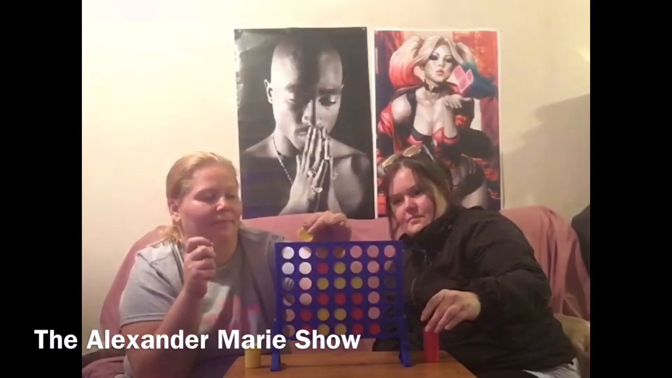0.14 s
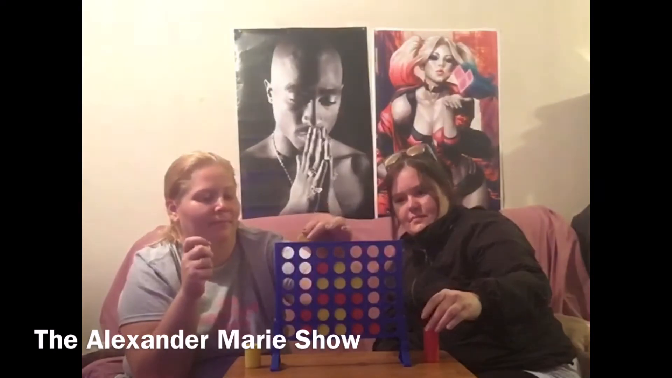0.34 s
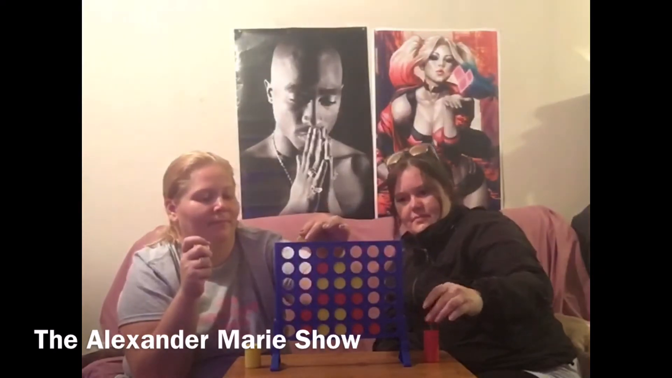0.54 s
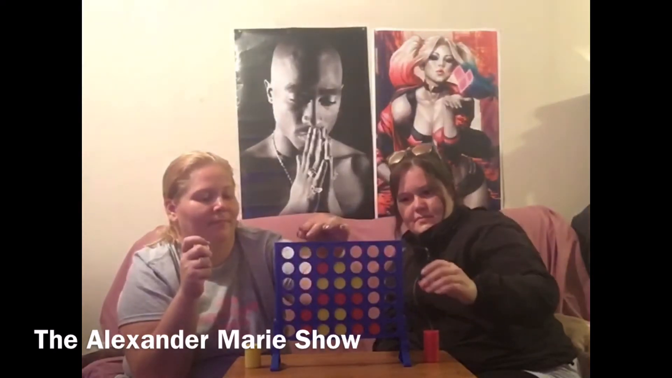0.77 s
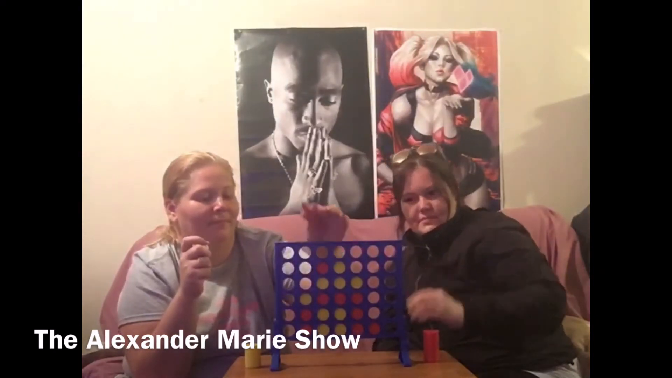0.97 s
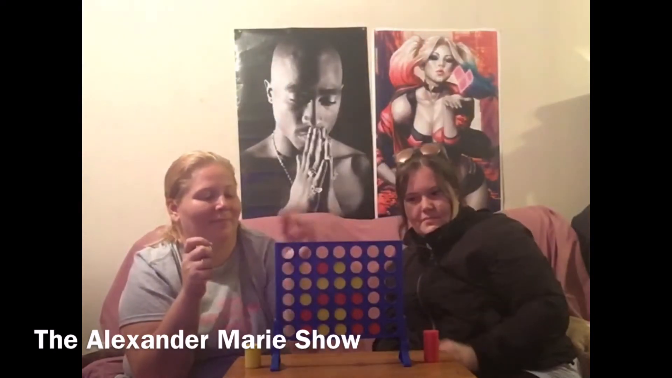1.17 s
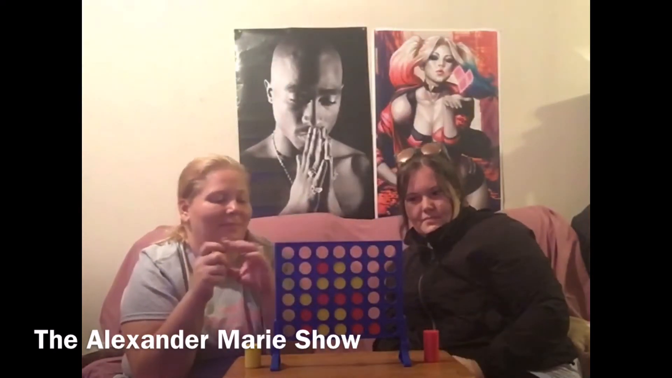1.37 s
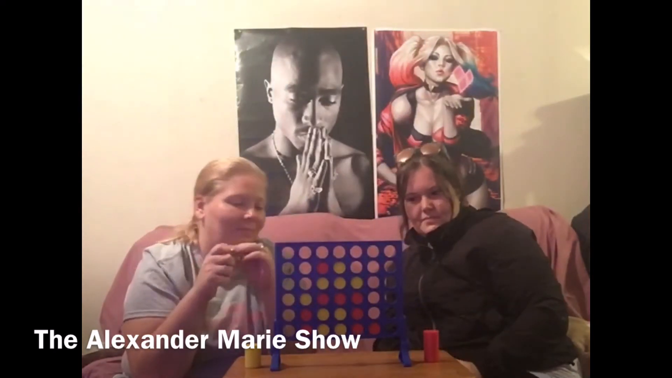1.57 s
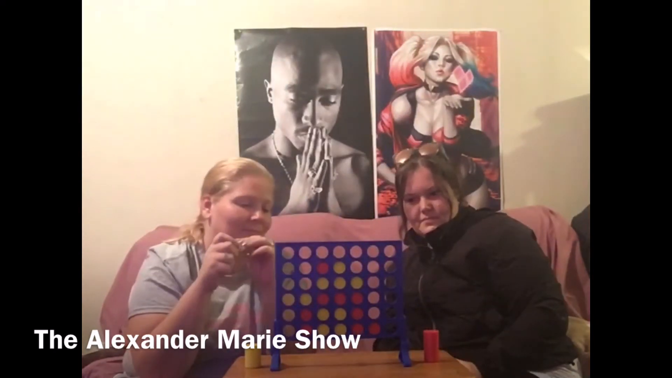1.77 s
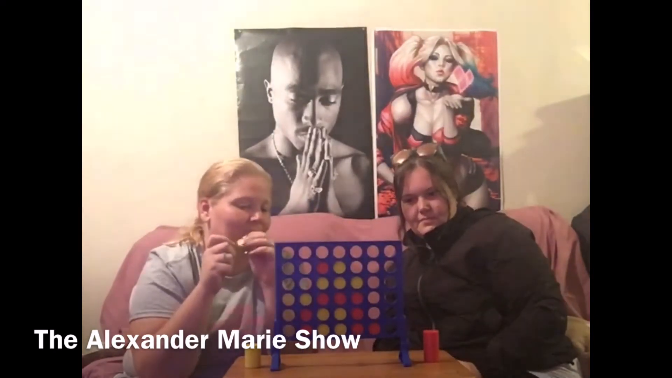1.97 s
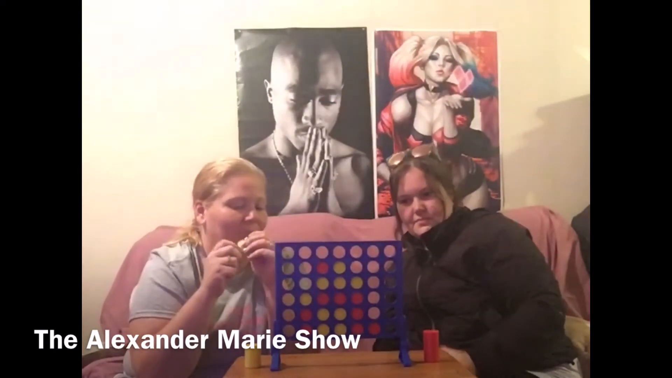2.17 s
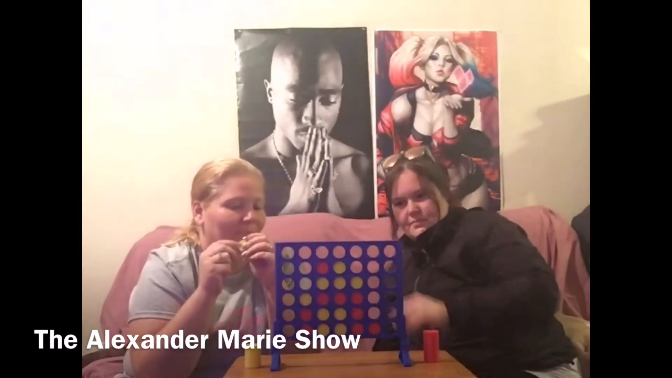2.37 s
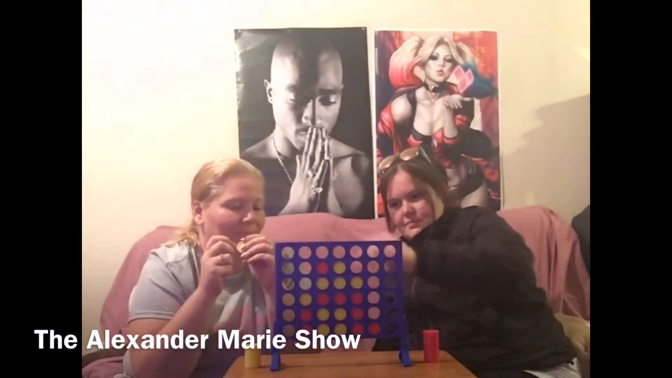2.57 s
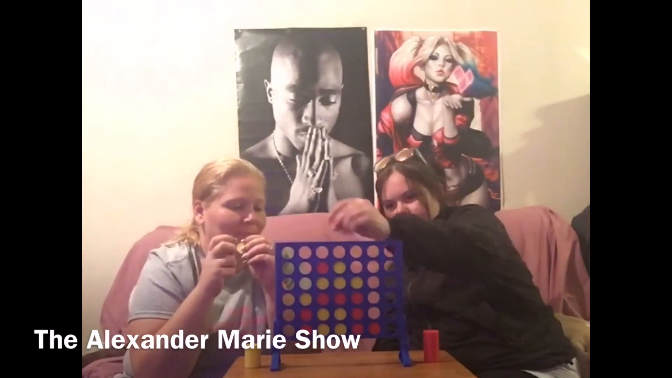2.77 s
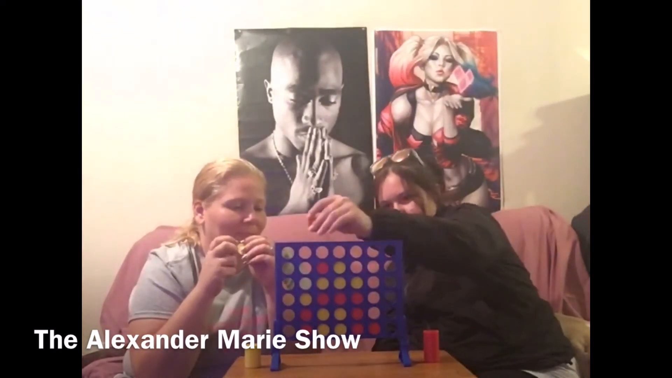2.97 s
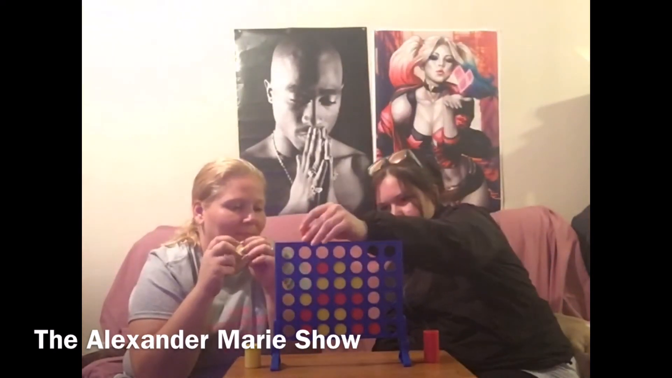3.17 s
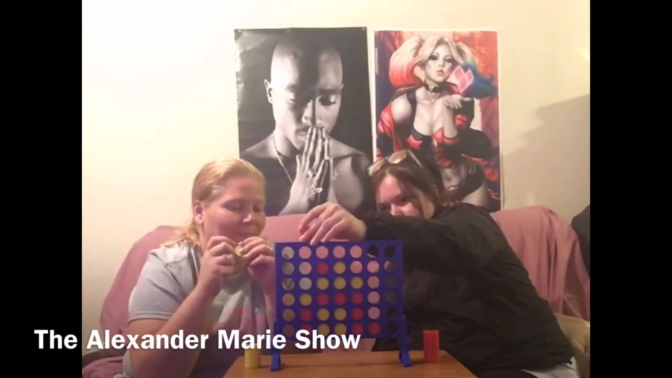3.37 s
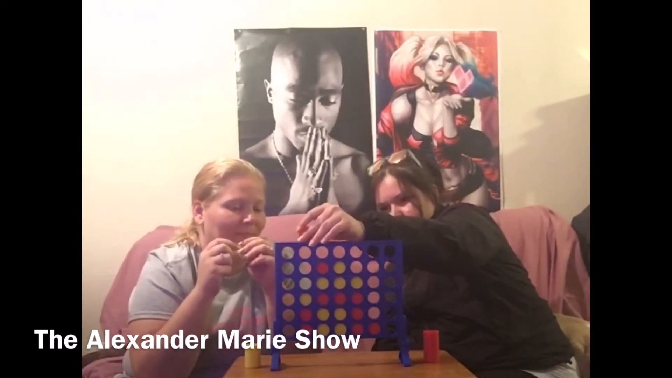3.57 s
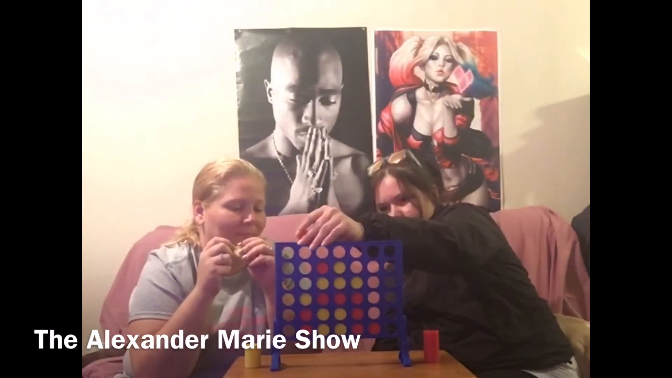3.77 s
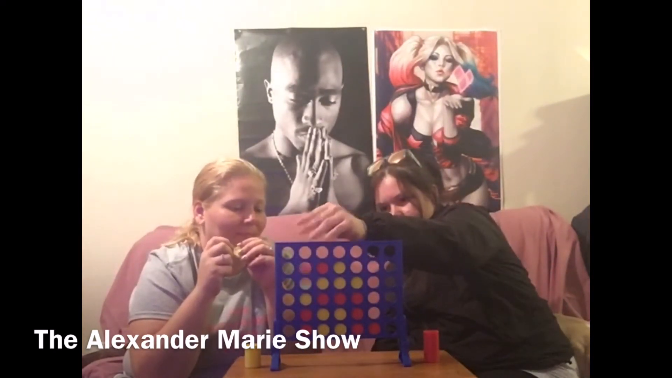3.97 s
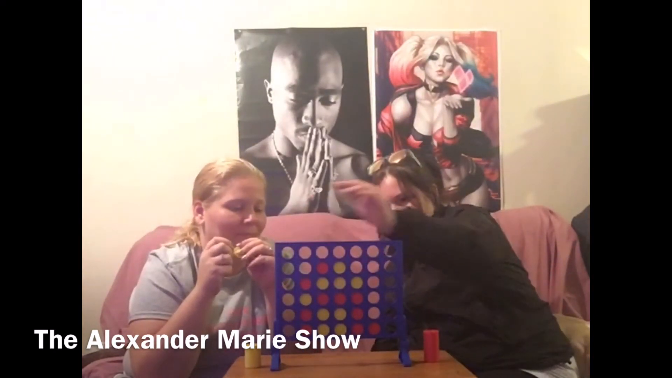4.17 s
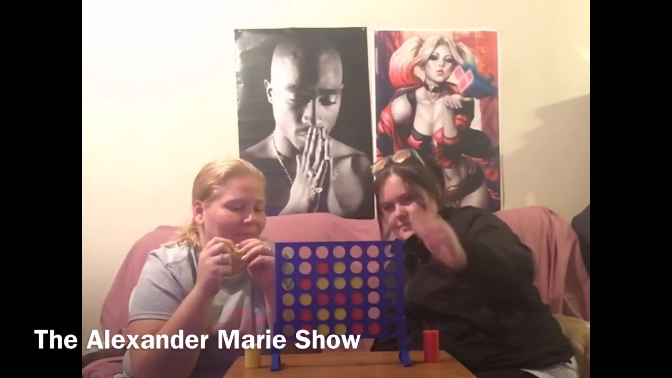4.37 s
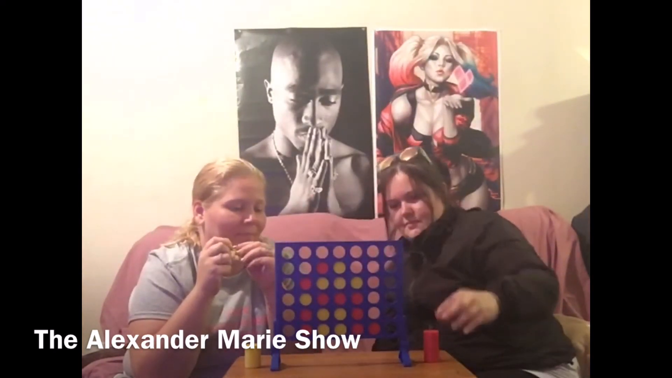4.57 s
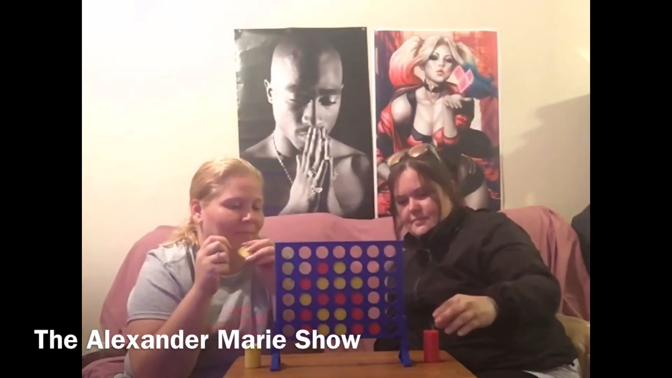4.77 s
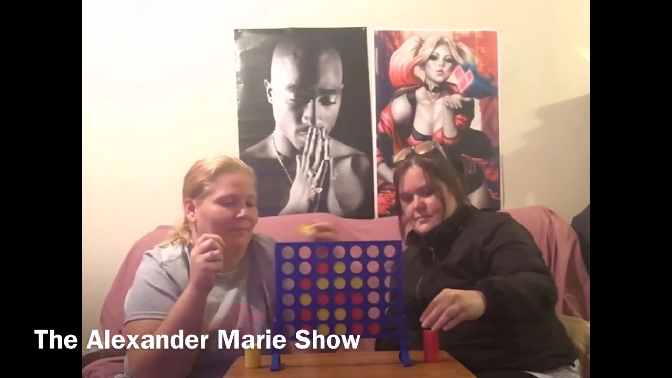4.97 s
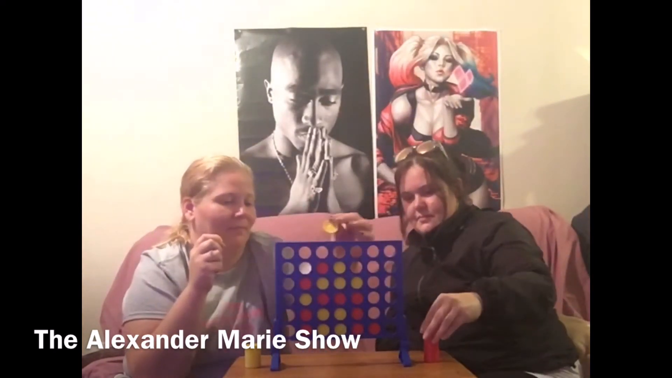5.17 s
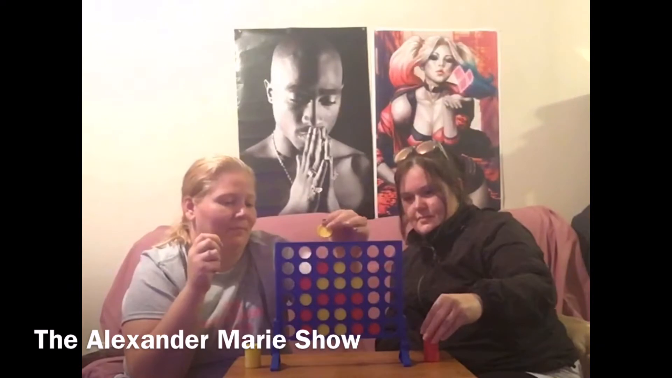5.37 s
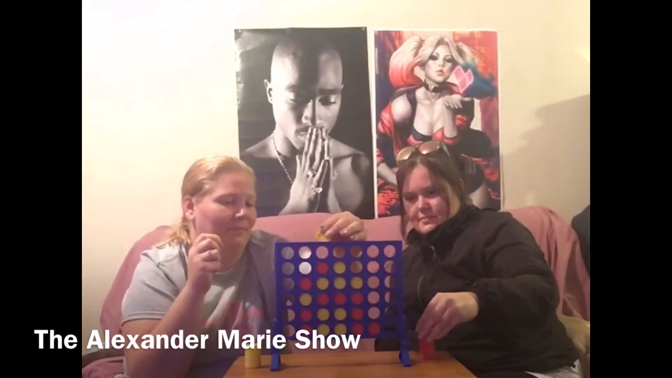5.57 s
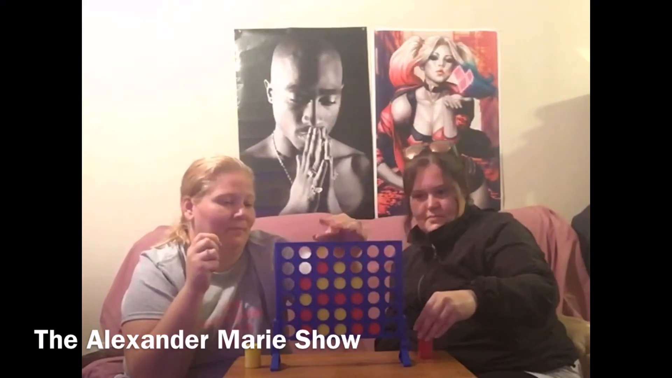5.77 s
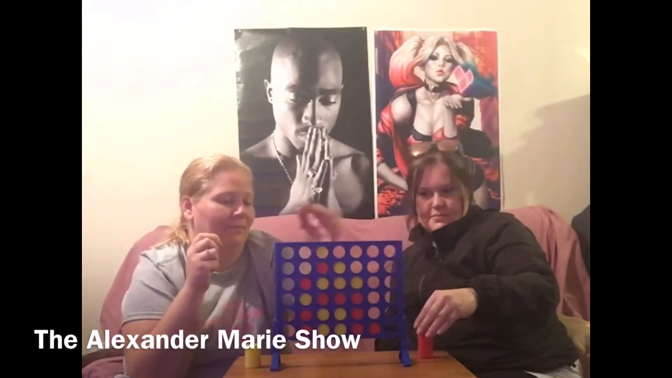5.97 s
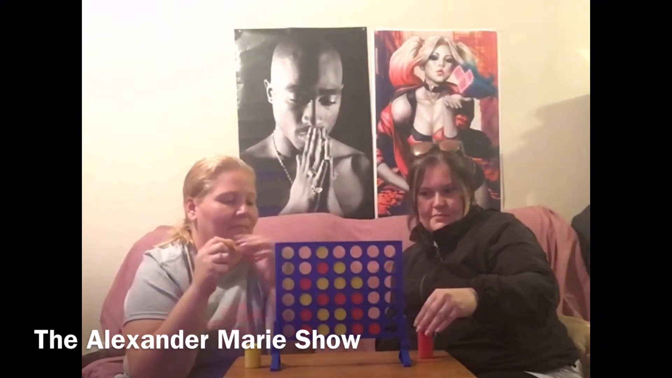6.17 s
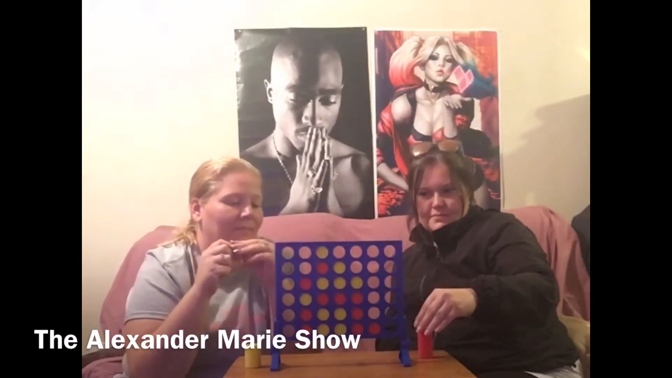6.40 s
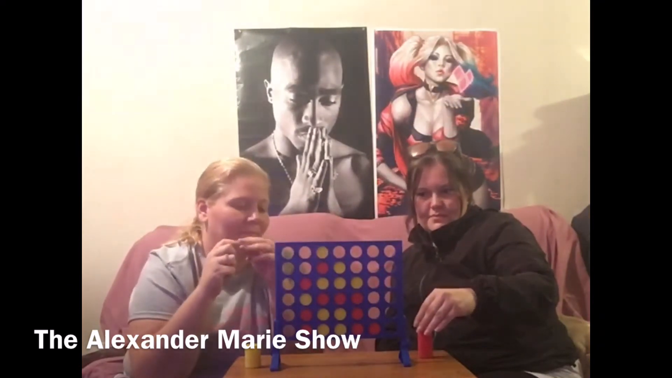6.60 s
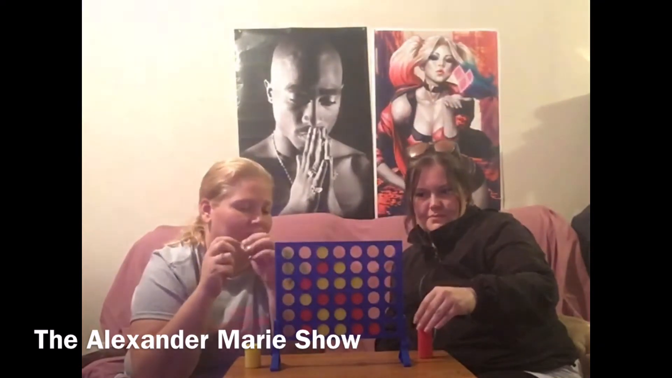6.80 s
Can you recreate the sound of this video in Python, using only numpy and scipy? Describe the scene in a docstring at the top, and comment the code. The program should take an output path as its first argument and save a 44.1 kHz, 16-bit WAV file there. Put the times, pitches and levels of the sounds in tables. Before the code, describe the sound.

A small furnished room, heard through a close, basic microphone: a low appliance rumble and wavering hum run throughout with faint air noise and soft, uneven sleeve rustle. Faint plastic ticks come at 0.15-0.45 s. From 0.7 to 0.95 s a disc drops into an upright plastic grid in a fast, bright, dry clatter, strongest near 0.82 s. Small clicks of handled discs follow around 1.65 s and, more distinctly, 2.1-2.8 s, peaking near 2.42 s, then scattered ticks from 3.1 to 3.7 s. At 3.92 s the second drop cracks loudest, slightly clipped, bouncing and chattering until 4.07 s with a short room tail. A barely audible swish comes at 4.75 s, a grainy singing scrape from 5.15 to 5.6 s, running into a softer third rattle at 5.58-5.75 s. Faint taps at 6.09 and 6.6 s and a tiny shuffle near 6.8 s end it.

```python
"""A small furnished room: an appliance hums, rumbles and whirs, air noise lies under it, sleeves rustle.
Plastic discs click as they are handled; from 0.7 s one drops down an upright plastic grid. More handling leads
to a second, louder drop near 3.9 s. Two slides follow, then a third drop near 5.6 s, two taps and a last slide.
Decaying modes make the discs, grid and table; noise makes cracks, chatter, cloth and the dense room tail.
The microphone path clips at full scale and cuts the top."""
import sys
import numpy as np
from scipy import signal
from scipy.fft import rfft, irfft
from scipy.io import wavfile
from scipy.ndimage import uniform_filter1d

SR = 44100
rng = np.random.default_rng(int(sys.argv[2]) if len(sys.argv) > 2 else 0)


def unload_audio(sound):
    """Save the sound as a 16-bit wav file, at the path given as the first command line argument."""
    columns = np.transpose(np.atleast_2d(sound))
    # keep every value between -1 and 1, then stretch to whole-number steps
    steps = np.round(np.clip(columns, -1, 1) * 32767)
    wavfile.write(sys.argv[1], SR, steps.astype(np.int16))


N = 301642


def undb(db):
    """Decibels to gain."""
    return 10 ** (np.asarray(db) / 20)


def unit(x):
    """Scale to rms 1."""
    return x / np.sqrt(np.mean(x ** 2))


def curve(rows):
    """Level over time: (t/s, level/dB) points joined by straight lines, -120 dB outside them."""
    t, db = np.transpose(rows)
    return np.interp(np.arange(N) / SR, t, db, left=-120, right=-120)


def noise(shape):
    """Noise of rms 1 whose spectrum follows (f/Hz, level/dB) points on a log frequency axis."""
    hz, db = np.transpose(shape)
    f = np.arange(1, N // 2 + 2) * SR / N
    gain = undb(np.interp(np.log(f), np.log(hz), db, left=-90, right=-90))
    return unit(irfft(rfft(rng.standard_normal(N)) * gain, N))


def narrow(hz, width_hz):
    """A tone whose level and phase wander: noise in a thin band, down to half at width_hz off centre."""
    f = np.arange(N // 2 + 1) * SR / N
    return unit(irfft(rfft(rng.standard_normal(N)) / (1 + ((f - hz) / width_hz) ** 2), N))


def walk(rate):
    """Smooth random wander of rms 1, from `rate` random values a second."""
    k = int(SR / rate)
    steps = np.repeat(rng.standard_normal(N // k + 1), k)
    return unit(uniform_filter1d(uniform_filter1d(steps, k), k)[:N])


def band_pass(low_hz, high_hz):
    """Second-order band filter."""
    return signal.butter(2, [low_hz, high_hz], "band", fs=SR, output="sos")


def decay(t, t60):
    """Exponential decay by 60 dB in t60 seconds."""
    return np.exp(-np.log(1000) * t / t60)


def ring(t, hz, db, t60):
    """Sum of decaying modes struck at t = 0."""
    modes = undb(db)[:, None] * np.sin(2 * np.pi * hz[:, None] * t) * decay(t, t60[:, None])
    return modes.sum(axis=0)


def appliance():
    """A low rumble that swells, a wavering hum, a steadier tone about an octave above and a faint whir."""
    # rumble spectrum: (f/Hz, relative level/dB)
    rumble_shape = [(13, -38.5), (22, -4), (41, 4), (54, 6), (71, -3.5), (91, -14.5), (110, -12),
                    (140, -34), (240, -120)]
    # swells of the rumble: (t/s, level/dB)
    rumble_level = [(0, -47), (.42, -50), (.5, -45), (1.1, -46), (1.92, -47.5), (2.65, -51.5),
                    (2.97, -37.5), (3.3, -42), (3.56, -36), (3.8, -39), (4.1, -42), (4.44, -40.5),
                    (4.73, -51), (5.0, -40.5), (5.3, -41.5), (6.21, -40.5), (6.46, -49), (6.84, -49)]
    # swells of the hum: (t/s, level/dB)
    hum_level = [(0, -66), (1.0, -53.5), (1.37, -50), (1.6, -64), (1.92, -44.5), (2.05, -60), (2.65, -48),
                 (2.97, -50.5), (3.35, -38.5), (3.56, -51), (3.9, -43.5), (4.08, -55), (4.6, -47),
                 (4.73, -56.5), (5.11, -47.5), (5.5, -53), (5.9, -75), (6.46, -45), (6.84, -62.5)]
    # thin whirring bands: (f/Hz, width/Hz, level/dB)
    whir_bands = [(1007, 22, -68.5), (1160, 25, -69.5), (1790, 46, -67), (5240, 83, -72.5)]
    hum_hz, whine_hz, whine_db, rumble_cut_hz = 119.3, 240.2, -56, 38

    rumble = noise(rumble_shape) + .5 * narrow(hum_hz / 2, 5.0)
    rumble *= undb(curve(rumble_level) + 2.0 * walk(6))
    rumble = signal.sosfilt(signal.butter(8, rumble_cut_hz, "high", fs=SR, output="sos"), rumble)
    hum = narrow(hum_hz, 2.9) * undb(curve(hum_level))
    steady = np.sin(2 * np.pi * whine_hz * np.arange(N) / SR)
    whine = unit(steady + .25 * narrow(whine_hz, 6.0)) * undb(whine_db)
    whir = sum(undb(db) * narrow(hz, width) for hz, width, db in whir_bands)
    return rumble + hum + whine + whir


def sleeves():
    """Sleeves rustle unevenly on the sofa: shaped noise whose level follows a curve and flutters."""
    # cloth spectrum: (f/Hz, relative level/dB)
    cloth_shape = [(240, -48.5), (400, -19.5), (953, -4), (1100, -5), (1640, -5), (2620, -9.5),
                   (3020, -12.5), (4310, -14), (6150, -23), (12000, -38), (15600, -69), (22000, -120)]
    # strength of the rustle: (t/s, level/dB)
    cloth_level = [(0, -57.5), (.28, -51.5), (.65, -55.5), (.9, -46), (1.2, -50.5), (1.5, -49.5),
                   (2.05, -50.5), (2.65, -48), (3.2, -51), (3.5, -52), (3.96, -52), (4.44, -54),
                   (4.65, -56.5), (5.1, -57), (5.5, -48), (5.87, -57.5), (6.84, -57.5)]
    return noise(cloth_shape) * undb(curve(cloth_level) + 1.7 * walk(25))


def background_air():
    """A faint bed of shaped noise whose level wanders slightly."""
    # air spectrum: (f/Hz, relative level/dB)
    air_shape = [(53, -41.5), (90, -8), (124, -6.5), (192, -12), (243, -15), (445, -22.5), (576, -27),
                 (685, -27), (1180, -35), (1490, -48), (1770, -29), (3770, -43.5), (4990, -34.5),
                 (7690, -46), (15700, -48)]
    air_db = -51.5
    return noise(air_shape) * undb(air_db + 0.96 * walk(5.9))


def disc_ring(t, hz, overtone_db, held):
    """A struck disc rings at its pitch and overtones; fingers damp it, a loose disc rings on."""
    # disc overtones: (f/Hz, level/dB, share of the ring's t60)
    overtones = [(7960, -6, .6), (8450, 2, .2), (9100, -4, .2), (12950, -14, .45), (13400, -9, .2)]
    over_hz, over_db, share = np.transpose(overtones)
    t60 = .009 if held else .036  # s
    shortest_t60 = 0.0043  # s, what fingers leave at least
    db = over_db + overtone_db
    if not held:
        # a loose disc sounds its long overtones more and its short ones less
        db = db + np.where(share > .3, 4.0, -6)
    mode_t60 = np.maximum(t60 * np.r_[1, share], shortest_t60)
    disc = ring(t, np.r_[hz, over_hz], np.r_[0, db], mode_t60)
    if held:
        # a pinched disc splits its ring: a second, weaker mode just below
        disc += ring(t, np.r_[hz * 0.98], np.r_[-8.5], np.r_[t60])
    return disc


def grid_shake(t, bars_db, rims_db, held):
    """The grid is so heavily damped that its modes run together; the bar nearest the blow rings longer."""
    # bar modes: (f/Hz, level/dB)
    bar_modes = [(1010, -25.5), (1430, -13), (1950, -6), (2400, -6.5), (2800, -3.5), (3250, -3.5),
                 (3650, 1), (4000, -3)]
    # rim modes: (f/Hz, level/dB)
    rim_modes = [(4650, -3), (5200, -0.5), (5650, 3.5), (6150, -8), (6600, -1), (7150, -10), (8800, -11.5),
                 (9700, -8.5)]
    grid_t60, spot_t60 = .007, .018  # s
    held_bar_hz, fall_bars_hz = 2246, (2767, 3508)
    held_tilt_db = -3  # dB per kHz about the held bar: fingers dull the higher bars
    spot_db = -5.5 if held else -7.0  # minus bars

    hz, db = np.transpose(bar_modes + rim_modes)
    rim = np.arange(len(hz)) >= len(bar_modes)
    # neighbouring modes swing in opposite directions
    sign = (-1.) ** np.arange(len(hz))
    tilt = held * held_tilt_db * (hz - held_bar_hz) / 1000
    db = db + np.where(rim, rims_db, bars_db + tilt) + 1.5 * rng.standard_normal(len(hz))
    # stacked discs shift the modes from knock to knock
    shifted_hz = hz * (1 + 0.034 * rng.standard_normal(len(hz)))
    frame = ring(t, sign * shifted_hz, db, np.full(len(hz), grid_t60))

    spot_hz = held_bar_hz if held else fall_bars_hz[rng.integers(2)]
    spot_hz *= 1 + .035 * rng.standard_normal()
    return frame + ring(t, np.r_[spot_hz], np.r_[bars_db + spot_db], np.r_[spot_t60])


def crack(t, rims_db, held):
    """The contact cracks: a brief burst of bright noise."""
    crack_db = -13 if held else -10.0  # minus rims, ahead of the filter
    burst = rng.standard_normal(len(t)) * np.exp(-t / 0.0061)
    return undb(rims_db + crack_db) * signal.sosfilt(band_pass(10800, 14800), burst)


def chatter(t, bars_db, rims_db):
    """A loose disc chatters in its slot: decaying noise in the bands of the bars and rims."""
    chatter_db, chatter_s = -8.5, 0.02  # minus bars and rims, ahead of the filters; time constant
    rattle = rng.standard_normal(len(t)) * np.exp(-t / chatter_s) * undb(chatter_db)
    bars = undb(bars_db) * signal.sosfilt(band_pass(1300, 4000), rattle)
    return bars + undb(rims_db) * signal.sosfilt(band_pass(4600, 7500), rattle)


def table_thud(t):
    """The table thuds with the bars that stand on it: low decaying modes."""
    # table modes: (f/Hz, level minus bars/dB, t60/s)
    table_modes = [(145.6, -30.5, 0.23), (230, -31, .06), (324, -29.5, 0.06), (487, -37, 0.023),
                   (729, -35, 0.028), (1017, -30, 0.073)]
    return ring(t, *np.transpose(table_modes))


def knocks():
    """Each knock rings the disc, shakes the grid, cracks briefly and jolts the table."""
    # knocks: (t/s, disc ring level/dB, disc pitch f/Hz,
    #          then minus ring: grid bars level/dB, grid rims level/dB, overtones level/dB)
    blows = [(0.1503, -48.5, 4020, 16.5, 2, -16), (0.2636, -35, 3840, -13, -15, -15),
             (0.285, -33, 4260, -2.5, -21, -24), (0.32, -26, 4293, -6, -37, -13.5),
             (0.4437, -36.5, 4030, -3, -11, -12), (0.6995, -17, 4300, -15, -12.5, -29.5),
             (0.715, -17, 4330, -16, -16.5, -10), (0.7449, -13.5, 4120, -3, -15, -15.5),
             (0.7516, -10.5, 4260, -14, -0.5, -20.5), (0.7702, -12, 4305, -6, -7, -30.5),
             (0.8127, -10, 4180, -15, -13.5, -20), (0.8234, 0, 4260, -5.5, -3.5, -16),
             (0.8505, -9.5, 4360, -10.5, -16.5, -38), (0.876, -20, 4400, 1.5, -1.5, -35),
             (0.917, -11.5, 4324, -2, -1, -6), (0.9271, -13.5, 4250, -12, -10, -30),
             (0.9462, -12.5, 4270, -13, -17, -32), (1.6434, -33, 4350, 5, -2, -20),
             (1.6584, -30.5, 4630, 7.5, -6, -6), (1.6838, -23, 4570, 5.5, -5.5, -0.5),
             (2.0732, -25, 4280, 3.5, -26, -9.5), (2.157, -33, 4100, -18, -24, -29),
             (2.183, -29, 4070, -3, -28, -29), (2.3078, -27, 3920, 4, -17, -5),
             (2.423, -14.5, 4110, -3.5, -26, -17), (2.484, -18, 4070, -10.5, -28, -28),
             (2.686, -30, 4330, -18, -22, -29), (2.7312, -31.5, 3770, -11, -22, -26),
             (2.7554, -27, 4100, -18, -19, -24), (2.7783, -24, 4030, -21, -31, -15),
             (3.0688, -33, 4340, 8, -8, -17), (3.1555, -20, 4020, -29, -20, -13),
             (3.246, -31, 4050, -22, -29, -33), (3.3877, -33, 4300, -16, -29, -32),
             (3.4004, -16, 4240, -26, -20.5, -9.5), (3.4783, -27, 4110, -14, -16, -15),
             (3.6038, -32.5, 4280, -22.5, -22.5, -20), (3.6555, -43.5, 4330, -6, -19.5, -29.5),
             (3.8431, -27.5, 3980, 3, -20.5, -27.5), (3.851, -22, 4330, -13, -15.5, -17.5),
             (3.872, -26.5, 4290, -3.5, -16.5, -25.5), (3.8987, -29.5, 4240, 3, -4, -15),
             (3.9243, 4.5, 4273, -8.5, -9.5, -18.5), (3.9355, -11, 4200, -12.5, -12, -22.5),
             (3.9558, -3, 4303, -15, -19.5, -29), (3.9785, -10.5, 4370, -13.5, -18.5, -25.5),
             (3.9877, -13.5, 4300, -17, -15.5, -26), (4.0032, -10, 4220, -6.5, -6.5, -24),
             (4.0141, -2, 4347, -13, -15.5, -14), (4.0348, -15, 4340, -19, -22, -22.5),
             (4.0478, -12.5, 4310, -19.5, -20.5, -28), (4.0732, -25, 4285, -17, -19.5, -27.5),
             (5.479, -42, 4320, -6, -5, -20), (5.584, -22.5, 4420, -5, -4, -11),
             (5.6048, -24, 4350, -3, -7.5, -12.5), (5.63, -21.5, 4280, -22, -15, -15),
             (5.651, -14.5, 4390, -14, -14.5, -21), (5.6735, -8.5, 4325, -4.5, -1.5, -8),
             (5.6828, -18.5, 4250, -5, -12, -14.5), (5.7095, -12, 4233, -24, -8.5, -26),
             (5.7216, -19.5, 4300, -2, -14, -19), (5.744, -20.5, 4235, -8.5, -20, -30),
             (6.0875, -38.5, 4120, -12, -20, -26), (6.5979, -31.5, 4310, -8.5, -24, -32)]
    # spans where the disc is loose, not between the fingers: (from t/s, to t/s)
    loose_spans = [(.27, .33), (.69, 1.0), (3.6, 4.2), (5.4, 5.8)]
    t = np.arange(SR // 8) / SR
    thin, thud = np.zeros(N + SR), np.zeros(N + SR)
    jolt = table_thud(t)
    for s, db, hz, bars, rims, overtone in blows:
        held = not any(a <= s <= b for a, b in loose_spans)
        hit = disc_ring(t, hz, overtone, held) + grid_shake(t, bars, rims, held) + crack(t, rims, held)
        if not held:
            hit += chatter(t, bars, rims)
        # fingers soften the contact: a slower rise
        rise_s = 0.00066 if held else 0.00043
        i = int(s * SR)
        thin[i:i + len(t)] += undb(db) * hit * (1 - np.exp(-t / rise_s))
        thud[i:i + len(t)] += undb(db + bars) * jolt
    # small open plastic parts radiate no bass
    thin = signal.sosfilt(signal.butter(2, 1100, "high", fs=SR, output="sos"), thin)
    return (thin + thud)[:N]


def room(x):
    """Direct sound plus a dense tail of noise whose octave bands die at their own rates."""
    # room decay: (f/Hz, t60/s)
    room_decay = [(500, 0.22), (2000, 0.29), (5000, 0.39), (10000, 0.27), (15000, 0.09)]
    tail_db, gap_s = 0.5, 0.0018  # tail energy against the direct sound
    early_db, early_s = 5, 0.012  # early boost over the tail, time constant
    t = np.arange(SR) / SR
    tail = np.zeros(len(t))
    hz, t60 = np.transpose(room_decay)
    for mid in 500 * 2. ** np.arange(6):
        octave = band_pass(mid / np.sqrt(2), min(mid * np.sqrt(2), .45 * SR))
        band_t60 = np.interp(np.log(mid), np.log(hz), t60)
        tail += signal.sosfilt(octave, rng.standard_normal(len(t))) * decay(t, band_t60)
    # the first reflections fade in after a short gap
    tail *= np.clip(t / gap_s - 1, 0, 1)
    tail *= 1 + undb(early_db) * np.exp(-t / early_s)
    return x + undb(tail_db) * signal.fftconvolve(x, tail / np.sqrt(np.sum(tail ** 2)))[:N]


def slide_gain(s, swell, hold, fade, db):
    """Gain of a slide: swell from 25 dB under its peak, hold, fade back."""
    times = s + np.cumsum([0, swell, hold, fade])
    return undb(curve(np.c_[times, db - 25 * np.array([1, 0, 0, 1])]))


def slides():
    """A disc or a sleeve slides: grainy shaped noise; the long scrape sets the disc singing."""
    # slides: (start t/s, swell t/s, hold t/s, fade t/s, peak level/dB)
    strokes = [(4.73, .04, .005, .08, -56.5), (5.15, 0.239, 0.188, .03, -52.5),
               (6.62, 0.19, .01, .05, -58.5)]
    # spectrum of the long scrape: (f/Hz, relative level/dB)
    scrape_shape = [(880, -31.5), (1500, -11), (3100, -1.5), (3520, -1.5), (4420, -12), (4870, -8),
                    (5270, -6.5), (9500, -24.5), (10700, -33), (13700, -30), (15700, -40)]
    swish = noise([(3000, -28), (6000, -4.5), (9000, -12), (15000, -11)])
    scrape = noise(scrape_shape)
    # singing tones, two of them fluttering in level
    scrape += .4 * narrow(4320, 30.0) + 0.1206 * narrow(13600, 380.0)
    scrape += .5 * undb(5.0 * walk(30)) * narrow(2100, 120.0)
    scrape += .5 * undb(5.0 * walk(30)) * narrow(3200, 150.0)
    shuffle = noise([(2000, -25.5), (4000, -1), (7000, -13.5), (10000, -23.5)])
    grain = undb(2.5 * walk(260) + 2.0 * walk(60))
    return grain * sum(x * slide_gain(*row) for x, row in zip((swish, scrape, shuffle), strokes))


def scene():
    """Everything that reaches the microphone."""
    return (appliance() + sleeves() + background_air() + room(knocks()) + slides())[None]


def record(dry):
    """The microphone port has a dip in the treble, the converter clips at full scale and the top is cut."""
    dip_hz, dip_width_hz, dip_share, top_hz = 10306, 800, 0.27, 15700
    dip = signal.lfilter(*signal.iirpeak(dip_hz, dip_hz / dip_width_hz, fs=SR), dry)
    heard = np.clip(dry - dip_share * dip, -1, 1)
    return signal.sosfilt(signal.ellip(12, .2, 75, top_hz, fs=SR, output="sos"), heard)


dry = scene()
out = record(dry)
unload_audio(out)
```